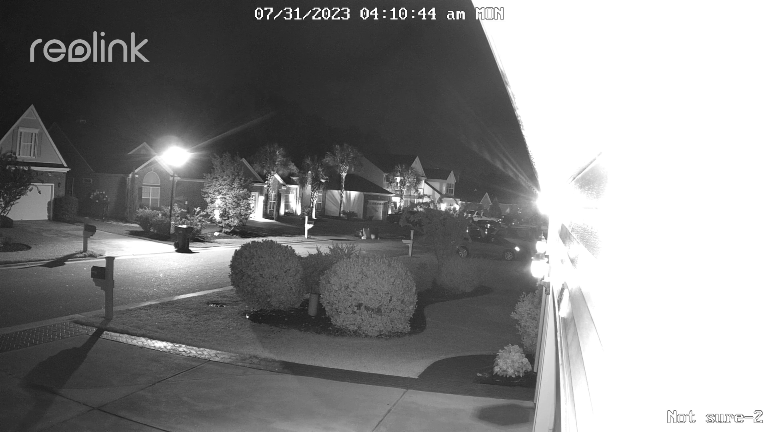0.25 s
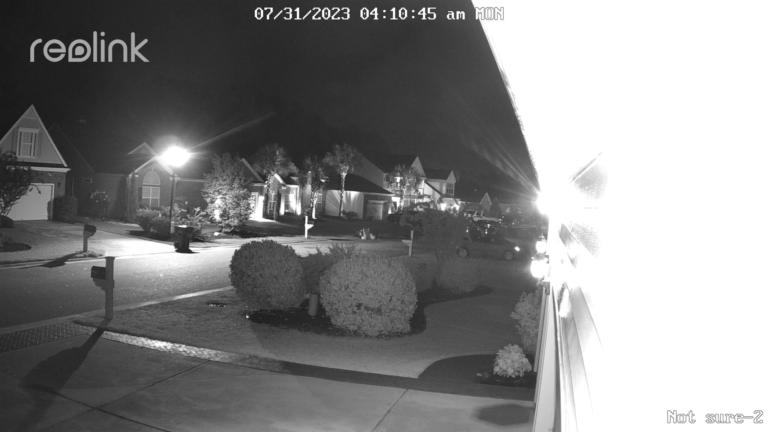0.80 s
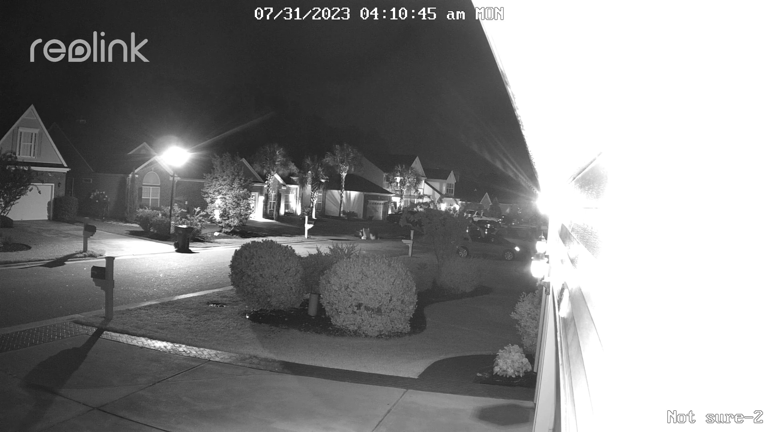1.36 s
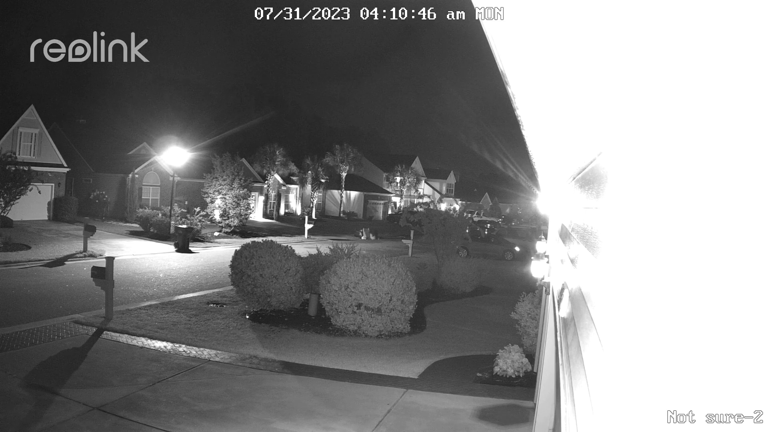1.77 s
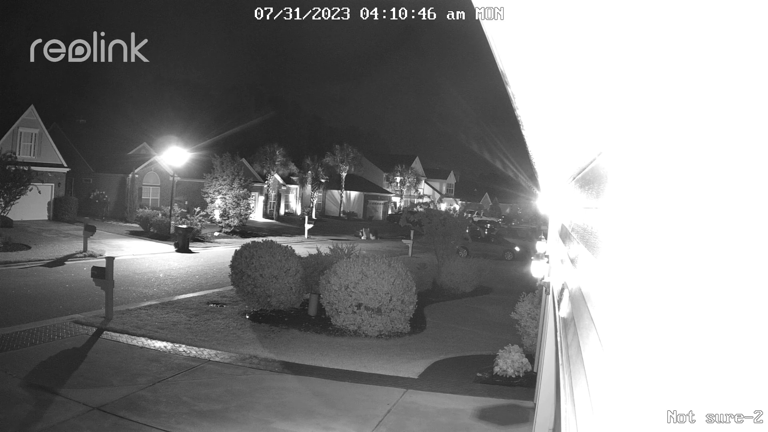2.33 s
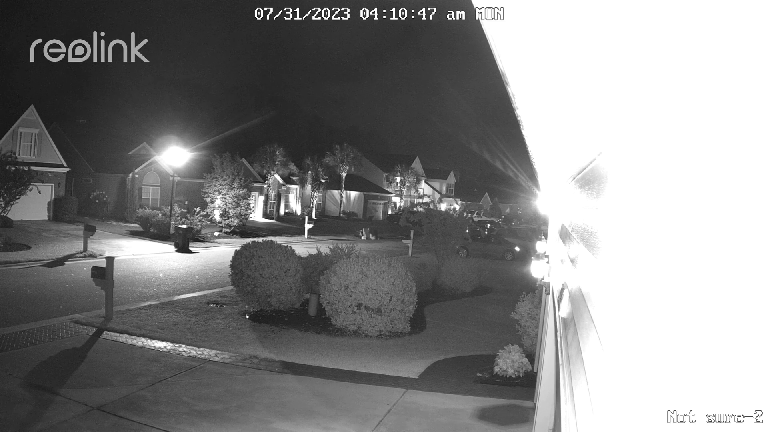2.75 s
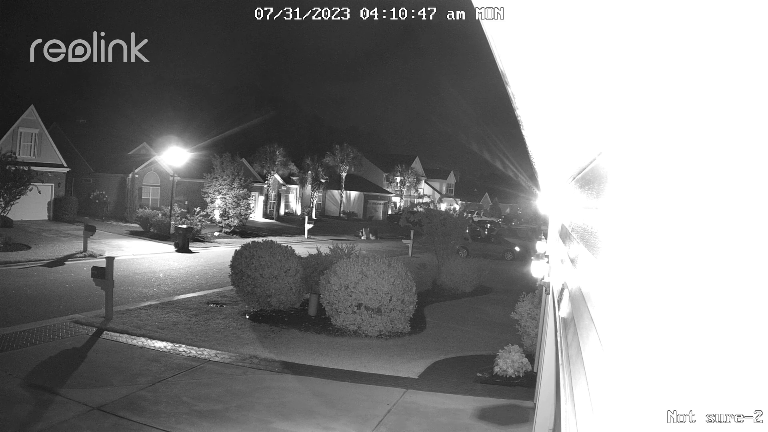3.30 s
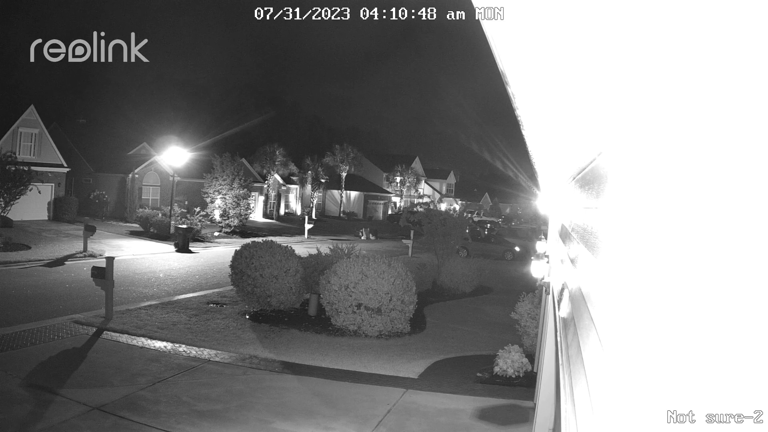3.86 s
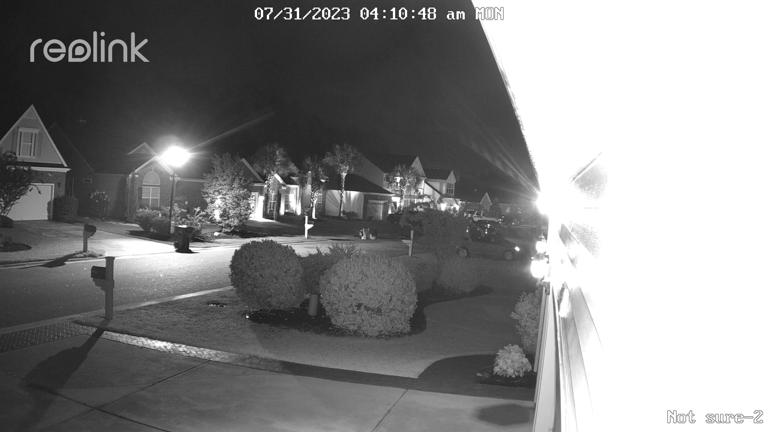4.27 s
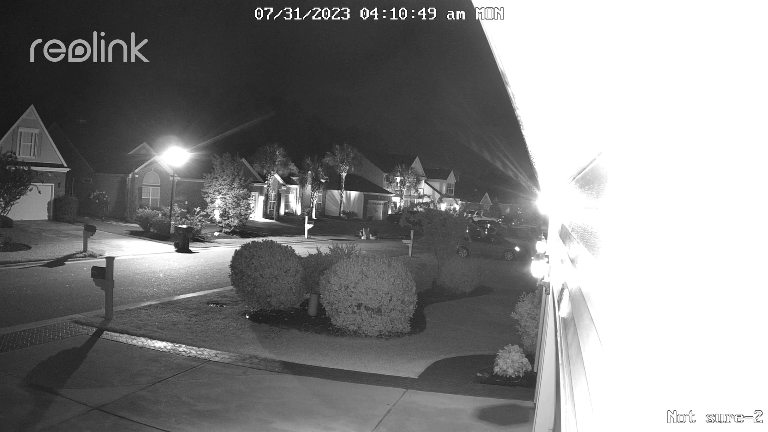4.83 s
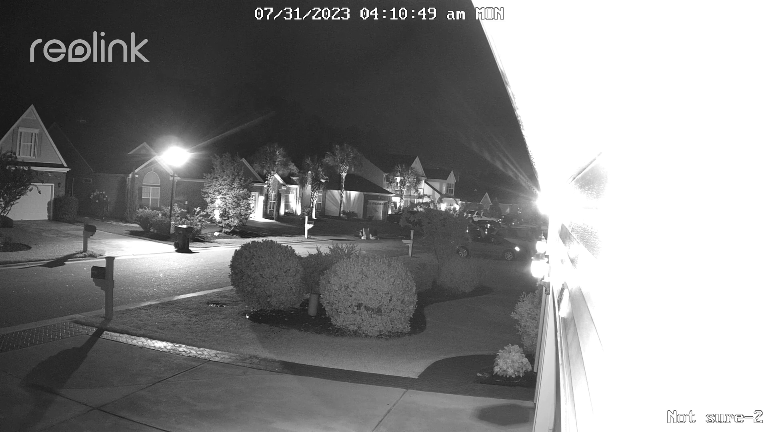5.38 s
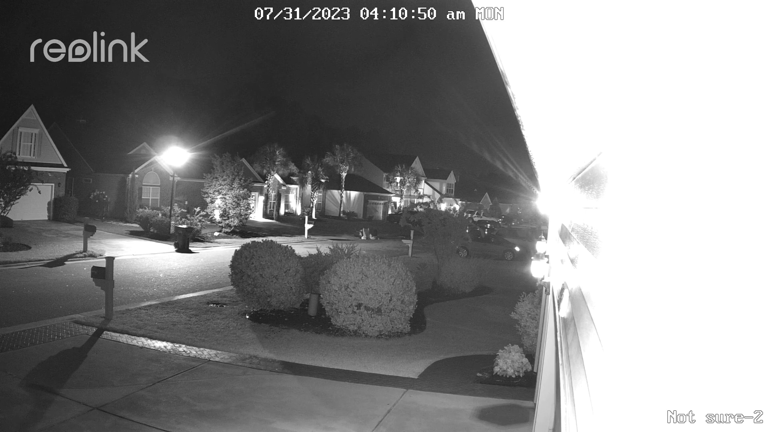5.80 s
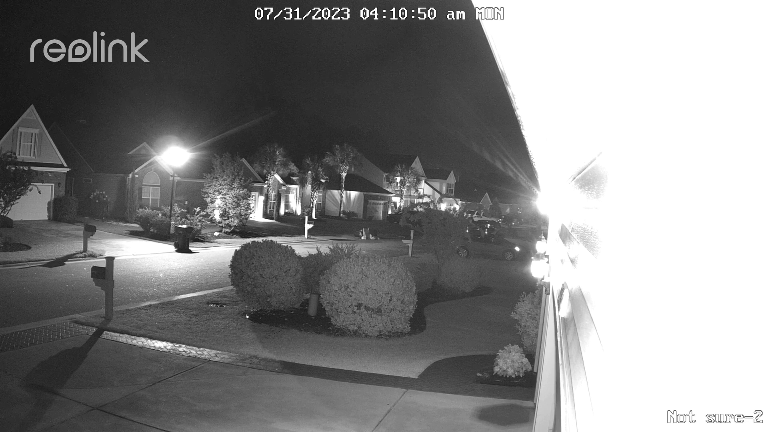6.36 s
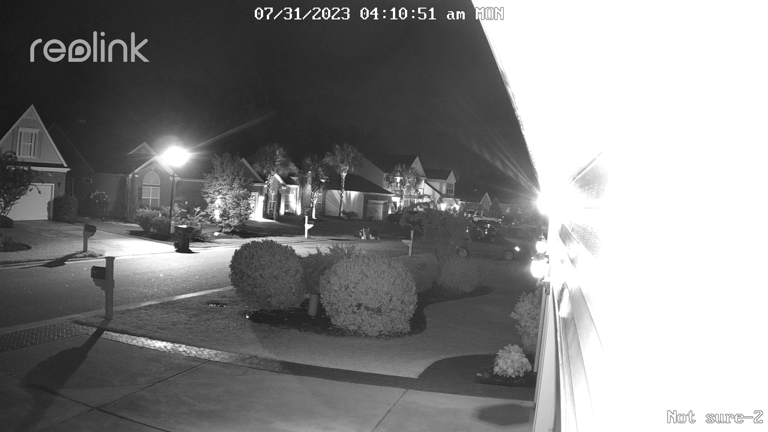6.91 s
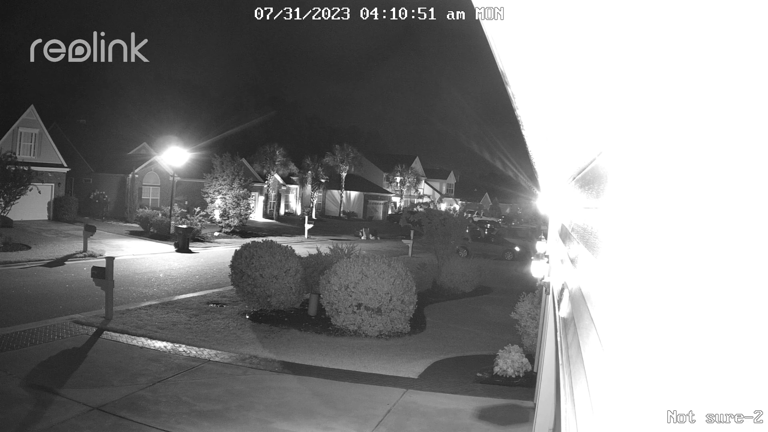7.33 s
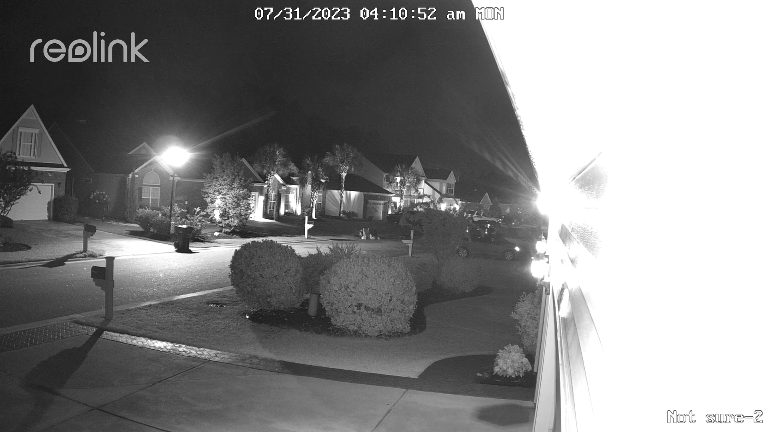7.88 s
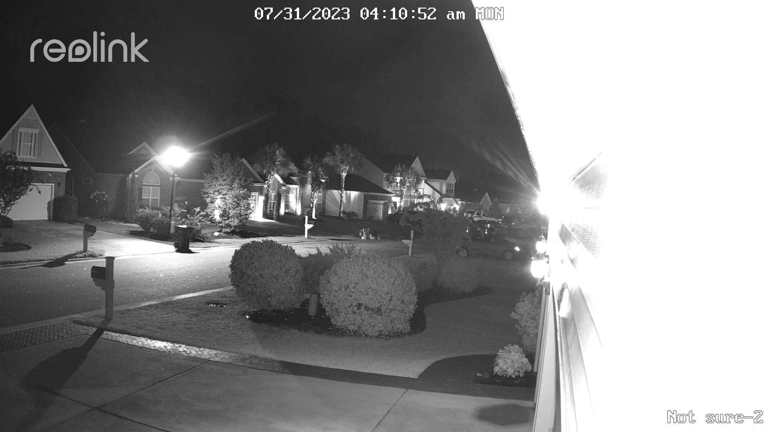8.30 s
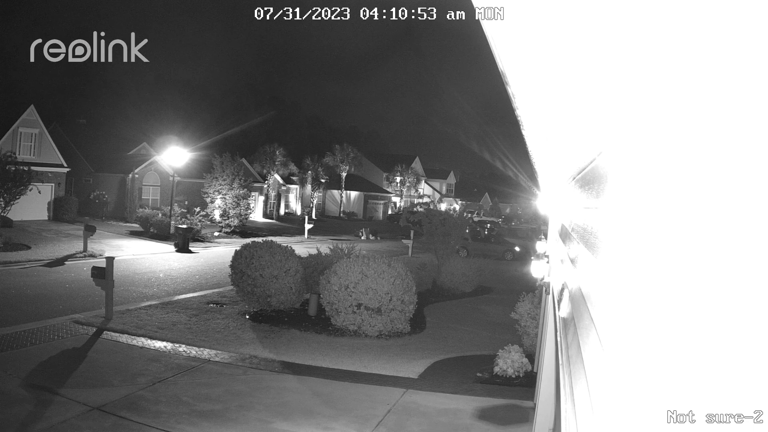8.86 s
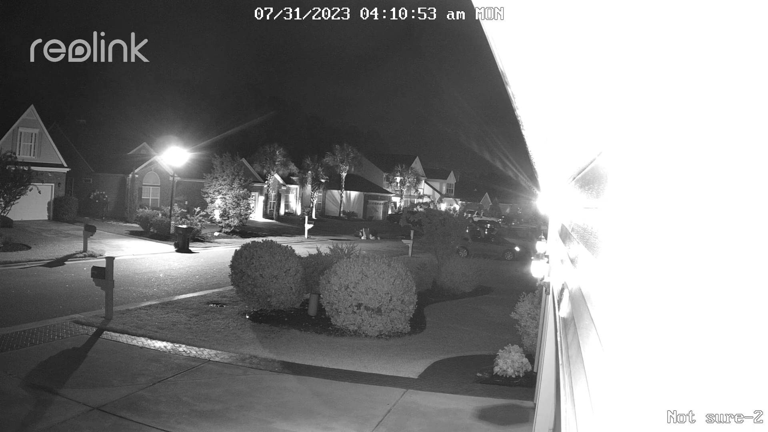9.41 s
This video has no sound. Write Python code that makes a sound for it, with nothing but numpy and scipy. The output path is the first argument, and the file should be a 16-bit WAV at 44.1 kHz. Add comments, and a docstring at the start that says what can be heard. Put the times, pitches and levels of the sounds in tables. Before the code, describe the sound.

On a quiet residential street at night, a close cricket sings almost nonstop in fast, high, falling pulses with brief pauses. A fainter cricket and a distant insect shimmer lie behind it, over very low rumble. Something small taps, clicks and rubs on the casing around the small outdoor microphone, in scattered bursts, busiest around four and a half seconds and again just after six.

```python
"""A near cricket chirps throughout, with short pauses, in quick groups of falling pulses, on a quiet
street on a summer night. Behind it, a far cricket sings across the lawn, over a distant insect chorus
and faint town rumble. Something small, perhaps a bug, taps and scuffs on the housing of the outdoor
security camera whose small microphone hears it all. Crickets are swept tones with echoes, the chorus
is bands of noise, and knocks and skids ring resonances of the housing."""
import sys
import numpy as np
from scipy import signal
from scipy.fft import rfft, irfft, next_fast_len
from scipy.io import wavfile
from scipy.ndimage import uniform_filter1d

SR = 44100
rng = np.random.default_rng(int(sys.argv[2]) if len(sys.argv) > 2 else 0)


def to_wav(s):
    """Save 16-bit WAV."""
    ch = np.atleast_2d(s).T  # columns
    pcm = np.round(np.clip(ch, -1, 1) * 32767)  # PCM
    wavfile.write(sys.argv[1], SR, pcm.astype(np.int16))


N = 423801
TIME = np.arange(N) / SR   # seconds

# Night air and town rumble. Each row: frequency in Hz, relative spectral level in dB.
AIR_COLOUR = [(20, -1), (42, 4), (55, 5), (110, -6), (200, -9), (330, -18), (550, -22), (900, -22),
              (1600, -27), (3800, -28), (5500, -19.5), (6800, -30), (7600, -38), (8800, -50.5)]
AIR_DB = -55.5   # rms
# Distant air conditioners. Each row: frequency in Hz, usual rms level in dB.
HUM = [(41.2, -65.5), (120, -65.5)]
# Thin faint tones that come and go. Each row: start in seconds, end in seconds, frequency in Hz, peak in dB.
WHISTLES = [(.24, 2.1, 2950, -74), (.24, 2.1, 2535, -79), (1.4, 3.4, 2892, -73), (3.05, 4.3, 2724, -80),
            (6.3, 8.5, 2805, -75)]
# Bands of far insects. Each row: centre in Hz, nominal width in Hz, usual level in dB, throbs per second.
CHORUS = [(2074, 180, -75.5, 8.2), (4400, 1200, -75.5, 54), (4700, 330, -66, 5.8), (5300, 170, -68, 41),
          (6113, 220, -63.5, 55)]
# A distant insect swells into a short trill.
# Each row: middle in seconds, half length in seconds, centre in Hz, level at the middle in dB.
TRILLS = [(.95, 0.15, 5350, -62), (4.05, 0.3, 5300, -60.5), (6.8, 0.2, 5340, -60),
          (8.697, 0.17, 5300, -58.5)]

# Resonances of the camera housing, hollow, stiff and sharp.
# Each row: frequency in Hz, width of one filter section in Hz, usual strength in dB.
HOLLOW_MODES = [(240, 260, -13), (430, 260, -8), (640, 300, -2), (860, 280, 0)]
STIFF_MODES = [(1220, 850, 0), (1730, 2130, -3.5), (2040, 200, 1.5)]
SHARP_MODES = [(2523, 230, -5.5), (3172, 610, -0.5), (3940, 800, -3.5), (4560, 435, 5.5), (5300, 1100, -16),
               (6550, 1140, -17.5)]
# Dull bumps that shake the mount. Each row: start in seconds, rms over 25 ms in dB.
BUMPS = [(1.161, -46), (1.351, -49), (4.618, -42), (6.213, -33), (6.235, -38), (6.273, -39.5)]
# Soft rubs on the housing. Each row: peak time in seconds, peak level in dB, swell in dB per second.
RUBS = [(.6, -63.5, 24), (.93, -47, 81), (1.19, -54, 98), (1.371, -43.5, 256.5), (2.581, -47.5, 245),
        (2.85, -52.5, 63), (3.05, -50.5, 130), (4.15, -59.5, 45), (4.4, -41.5, 165), (4.728, -43, 34),
        (5.74, -54.5, 161), (6.269, -41.5, 202), (7.5, -66, 33.5), (7.72, -63, 99), (7.96, -63.5, 104)]
RUB_FADE_DB_PER_S = 80   # all rubs die away alike
# Colour of the rubbing noise. Each row: frequency in Hz, relative spectral level in dB.
RUB_COLOUR = [(80, 0.5), (260, 6.5), (450, -1), (850, -2.5), (1300, -3), (2000, -5), (3200, 1), (4300, 4),
              (5500, -4), (7500, -22), (9000, -35)]
# Scuffs on the housing. Each row: start in seconds, length in seconds, hollow and sharp levels in dB.
SCUFFS = [(0.915, 0.023, -42, -54), (0.944, 0.028, -56, -70), (1.155, 0.015, -47, -46.5),
          (3.056, 0.028, -55.5, -54), (4.221, 0.033, -61, -54), (4.336, 0.037, -55, -40),
          (4.463, 0.086, -56, -41), (5.82, .07, -64, -60), (6.105, 0.096, -62, -47),
          (6.19, 0.019, -43.5, -32), (6.225, 0.065, -52, -40), (6.263, 0.024, -47.5, -34.5),
          (6.295, 0.016, -56, -36.5), (7.45, 0.12, -82, -58), (7.927, 0.033, -62, -55)]
# Single taps on the housing. Each row: start in seconds, hollow, stiff and sharp rms over 10 ms in dB.
TAPS = [(0.7255, -55.5, -80, -58), (0.851, -55, -70, -39.5), (1.144, -63, -61, -40),
        (1.348, -35.5, -41.5, -24.5), (2.3823, -51.5, -70, -60), (2.5417, -44, -62, -35),
        (2.6045, -54, -73, -50), (2.7953, -56, -59, -39), (2.818, -56, -54, -42),
        (2.987, -52.5, -70, -43.5), (3.007, -47.5, -64, -37), (3.031, -40, -63, -39),
        (4.3486, -51, -60, -40), (4.359, -40.5, -53, -35), (4.3694, -47, -48, -30),
        (4.386, -43, -42.5, -23.5), (4.461, -50, -59, -28), (4.4823, -41, -44, -25),
        (4.5287, -65, -44, -34.5), (4.617, -44.5, -54, -36.5), (4.6256, -39, -42, -23),
        (4.666, -56, -46, -42), (4.7085, -45.5, -38, -25.5), (5.6023, -73, -75, -52),
        (5.7076, -37.5, -42.5, -38), (6.2149, -37.5, -48, -28.5), (6.22, -36.5, -47, -30.5),
        (6.7906, -71, -73, -52), (7.3764, -76, -71, -48.5), (7.566, -79, -82, -54),
        (7.724, -48.5, -74, -48), (7.919, -46, -74, -53), (7.944, -47.5, -71, -35.5),
        (8.0604, -74, -72, -50)]

# The near cricket sings triplets until an odd chirp opens a new phrase.
# Each row: start in seconds, strokes in the opening chirp (0 = it falls silent until the next row).
PHRASES = [(0.009, 3), (0.528, 5), (0.623, 5), (1.003, 6), (1.775, 1), (1.861, 5), (2.019, 0), (2.46, 5),
           (2.607, 4), (2.677, 5), (2.768, 2), (2.806, 5), (2.894, 5), (2.983, 4), (3.34, 4), (3.811, 4),
           (3.886, 2), (4.041, 5), (4.129, 2), (4.227, 5), (4.32, 4), (4.395, 4), (4.465, 4), (4.724, 4),
           (4.858, 4), (5.045, 6), (5.157, 5), (5.84, 0), (6.131, 4), (6.209, 2), (6.25, 5), (6.777, 6),
           (6.995, 3), (7.051, 5), (7.193, 0), (7.33, 4), (7.455, 5), (8.05, 6), (8.57, 4), (8.642, 5),
           (8.797, 2), (8.965, 0), (9.348, 4), (9.64, 0)]
WINGBEAT_S = .0146   # usual time from stroke to stroke
STROKE_DB, SLOW_BEAT_DB_PER_MS = -34, 0.93   # usual peak of a first stroke; slower beats are louder

# Moments when the treble drops out. Each row: start in seconds, end in seconds.
DROPOUTS = [(1.325, 1.384), (2.413, 2.599), (4.332, 4.389), (4.588, 4.646), (6.06, 6.119), (7.278, 7.335),
            (9.325, 9.384)]
CUTOFF_HZ = 8900   # top of the band


def from_db(db):
    """Decibels to gain."""
    return 10 ** (np.asarray(db) / 20)


def rms_one(x):
    """Scale to rms 1."""
    return x / np.sqrt(np.mean(x ** 2) + 1e-20)


def add(track, start, sound):
    """Mix a sound into the track from a start in seconds, trimmed to the track."""
    at = int(round(start * SR))
    lo, hi = max(at, 0), min(at + len(sound), N)
    if hi > lo:
        track[lo:hi] += sound[lo - at:hi - at]


def drift(rate, size=N):
    """A random wander of rms 1: straight lines between random knots, rate knots per second."""
    position = np.arange(size) / SR * rate
    knots = rng.standard_normal(12000)
    return rms_one(np.interp(position, np.arange(len(knots)), knots))


def noise(gain_at):
    """Noise of rms 1 whose spectrum follows a function of frequency."""
    size = next_fast_len(N)
    hz = np.maximum(np.fft.rfftfreq(size, 1 / SR), 1)
    spectrum = rfft(rng.standard_normal(size)) * gain_at(hz)
    return rms_one(irfft(spectrum, size)[:N])


def coloured(points):
    """Noise with a spectrum given as (Hz, dB) points, joined along log frequency."""
    at, db = np.transpose(points)
    return noise(lambda hz: from_db(np.interp(np.log(hz), np.log(at), db)))


def resonate(force, modes, scatter_db=3.0):
    """Parallel resonances with steep skirts; each contact point favours them differently."""
    out = 0
    for k, (hz, width, db) in enumerate(modes):
        r = np.exp(-np.pi * width / SR)
        section = [(1 - r * r) / 2, 0, (r * r - 1) / 2, 1, -2 * r * np.cos(2 * np.pi * hz / SR), r * r]
        strength = from_db(db + scatter_db * rng.standard_normal())
        sense = (-1) ** k   # neighbours move in opposite senses
        out = out + sense * strength * signal.sosfilt([section, section], force)
    return out


def echoes(x, t60, count=60):
    """Scattered reflections from walls, paving and shrubs; a response of unit energy."""
    delay = rng.uniform(.002, .16, count)   # seconds
    response = np.zeros(SR // 5)
    response[(delay * SR).astype(int)] = rng.standard_normal(count) * from_db(-60 * delay / t60)
    return signal.fftconvolve(x, response / np.linalg.norm(response))[:N]


def stroke(hz, rise, fall_per_s=49000, bend=4140000.0, fade=0.0071):
    """One wing stroke, centred in 20 ms: the scraper slows along the file, so the tone falls ever faster."""
    t = np.arange(-SR // 100, SR // 100) / SR
    reach = np.minimum(np.where(t < 0, -t / rise, t / fade), 1)
    swell = np.cos(np.pi / 2 * reach) ** np.where(t < 0, 1, 1.5)
    pitch = hz - fall_per_s * t - bend * t * t   # fall in Hz per s, bend in Hz per s squared
    return swell * np.sin(2 * np.pi * (np.cumsum(pitch) / SR + rng.random()))


def town():
    """Rumble and hiss as coloured noise, with far machines as tones wavering in level and phase."""
    hum = np.zeros(N)
    for hz, db in HUM:
        level = from_db(db + 2 * drift(2.8)) * np.sqrt(2)   # rms to peak
        hum += level * np.sin(2 * np.pi * hz * TIME + 0.64 * drift(3))
    return from_db(AIR_DB) * coloured(AIR_COLOUR) + hum


def whistles():
    """Thin, nearly steady tones come in quickly and fade out over half a second."""
    out = np.zeros(N)
    for start, end, hz, db in WHISTLES:
        gate = np.clip(np.minimum((TIME - start) / .04, (end - TIME) / .5), 0, 1)
        pitch = hz + 3 * drift(14)
        out += gate * from_db(db) * np.sin(2 * np.pi * np.cumsum(pitch) / SR)
    return out


def chorus(throb=0.17):
    """Many distant singers of each kind blur into a narrow, throbbing band of noise."""
    out = np.zeros(N)
    for centre, width, db, rate in CHORUS:
        band = noise(lambda hz: 1 / (1 + ((hz - centre) / (1.1 * width)) ** 2) ** 1.22)
        uneven_rate = rate * (1 + .15 * drift(8))
        beat = np.sin(2 * np.pi * np.cumsum(uneven_rate) / SR)
        waver_db = .7 * drift(9)
        out += band * (1 + throb * beat) * from_db(db + waver_db)
    return out


def trills(width_hz=110):
    """One far singer, a narrow band of noise, rises out of the chorus now and then."""
    out = np.zeros(N)
    for middle, half, centre, db in TRILLS:
        band = noise(lambda hz: np.exp(-((hz - centre) / width_hz) ** 2))
        out += band * from_db(db) * np.exp(-((TIME - middle) / half) ** 2)
    return out


def far_cricket(hz=4810, db=-52, period=0.058, gap=.019, echo_db=-8):
    """A second cricket of the same kind sings steady triplets across the lawn, with strong echoes."""
    out = np.zeros(N)
    for chirp in range(170):
        start = chirp * period + rng.normal(0, .003)
        for k in range(3):
            gain = from_db(db + rng.normal(0, 1.0))
            pulse = stroke(hz + rng.normal(0, 30), rise=0.0051)
            add(out, start + k * gap, gain * pulse)
    return out + from_db(echo_db) * echoes(out, t60=0.24)


def blip(start=8.878, hz=2630, db=-44, peak_s=.0016):
    """One small rounded pip: a tone that swells at once and dies away."""
    out, t = np.zeros(N), np.arange(SR // 25) / SR
    swell = t / peak_s * np.exp(1 - t / peak_s)
    add(out, start, from_db(db) * swell * np.sin(2 * np.pi * hz * t))
    return out


def bumps(low_hz=75, high_hz=230, fade_s=0.021):
    """The mount shudders for a moment under a heavier push: a dying burst of low noise."""
    out, t = np.zeros(N), np.arange(SR // 10) / SR
    band = signal.butter(2, [low_hz, high_hz], "band", fs=SR, output="sos")
    for start, db in BUMPS:
        push = rng.standard_normal(len(t)) * np.exp(-t / fade_s)
        shudder = rms_one(signal.sosfilt(band, push)) / 2   # rms 1 over 25 ms
        add(out, start, from_db(db) * shudder)
    return out


def rubbing(grain_db=3.0, clump_db=2.0):
    """A soft crackly rustle, noise of uneven grain, swells to each peak and dies away after it."""
    levels = [db - np.maximum(swell * (peak - TIME), RUB_FADE_DB_PER_S * (TIME - peak))
              for peak, db, swell in RUBS]
    level_db = np.max(levels, axis=0)   # the loudest rub wins
    grains = rms_one(from_db(grain_db * drift(400) + clump_db * drift(70)))
    return coloured(RUB_COLOUR) * grains * from_db(level_db)


def scuffs(grain_db=-1.5, stiff_db=-4, rise_s=0.00073, fade_s=0.0046):
    """Dense uneven slips, as noise under a brief pressure, shake the same modes as the taps."""
    out, t = np.zeros(N), np.arange(SR // 8) / SR
    for start, length, hollow_db, sharp_db in SCUFFS:
        pressure = np.clip(t / rise_s, 0, 1) * np.exp(-np.maximum(t - length, 0) / fade_s)
        grains = from_db(grain_db * drift(586.6, size=len(t)))
        force = pressure * rng.standard_normal(len(t)) * grains
        parts = ((HOLLOW_MODES, hollow_db), (SHARP_MODES, sharp_db), (STIFF_MODES, hollow_db + stiff_db))
        for modes, db in parts:
            ring = np.sqrt(length / t[-1]) * rms_one(resonate(force, modes))   # longer scuffs carry more
            add(out, start, from_db(db) * ring)
    return out


def taps(contact_s=0.0031, grit=0.22, echo_db=-15):
    """A contact with a short gritty skid, a click and dying noise, rings the housing."""
    out, t = np.zeros(N), np.arange(SR // 25) / SR
    for start, *levels in TAPS:
        force = (t == 0) + grit * rng.standard_normal(len(t)) * np.exp(-t / contact_s)
        for modes, db in zip((HOLLOW_MODES, STIFF_MODES, SHARP_MODES), levels):
            ring = rms_one(resonate(force, modes)) / 2   # rms 1 over 10 ms
            add(out, start, from_db(db) * ring)
    return out + from_db(echo_db) * echoes(out, t60=0.14)


def chirps():
    """The wings beat steadily and skip one beat after each chirp; gives (start s, strokes, beat s)."""
    for (start, strokes), (end, _) in zip(PHRASES, PHRASES[1:]):
        opening = round(strokes)
        if opening:
            beats_left = (end - start) / WINGBEAT_S - opening - 1
            triplets = max(round(beats_left / 4), 0)
            phrase = [opening] + [3] * triplets
            beat = (end - start) / (sum(phrase) + len(phrase))   # fills the phrase exactly
            for count in phrase:
                yield start, count, beat
                start += (count + 1) * beat


def near_cricket(first_hz=4710, later_hz=4600, scatter_hz=34, sag_db=0.96, chirp_db=0.47, stroke_db=0.8,
                 sweep_scatter=.15, hurry_s=.0004, first_rise=0.0056, later_rise=0.0041,
                 wall_s=.012, wall_db=-20, echo_db=-20):
    """Chirps ease into a usually highest, loudest stroke; later ones hurry, start sharply and sweep unevenly."""
    out = np.zeros(N)
    for start, strokes, beat in chirps():
        db = STROKE_DB + SLOW_BEAT_DB_PER_MS * (beat - WINGBEAT_S) * 1000
        db += chirp_db * rng.standard_normal()
        for k in range(strokes):
            hz = later_hz + (first_hz - later_hz) * 0.25 ** k + scatter_hz * rng.standard_normal()
            gain = from_db(db - sag_db * min(k, 2) + stroke_db * rng.standard_normal())
            fall = 47000 * (1 + sweep_scatter * rng.standard_normal())   # Hz per s
            pulse = stroke(hz, later_rise if k else first_rise, fall_per_s=fall)
            middle = start + k * beat + (-hurry_s if k else hurry_s)
            add(out, middle - len(pulse) / SR / 2, gain * pulse)
    wall = np.pad(out, (int(wall_s * SR), 0))[:N]   # the house front sends each stroke back
    return out + from_db(wall_db) * wall + from_db(echo_db) * echoes(out, t60=0.19)


def scene():
    """Everything reaches one microphone."""
    background = town() + whistles()
    insects = chorus() + trills() + far_cricket() + near_cricket()
    housing = bumps() + rubbing() + scuffs() + taps()
    return (background + insects + housing + blip())[None]


def record(dry, dull_stop_hz=4520 * 1.092, microphone_hz=7900):
    """Peaks are rounded, the treble drops out for moments, and the band ends near 9 kHz."""
    rounded = .3 * np.tanh(dry / .3)
    sound = signal.sosfilt(signal.butter(8, microphone_hz, fs=SR, output="sos"), rounded)
    dull = signal.sosfiltfilt(signal.cheby2(12, 40, dull_stop_hz, fs=SR, output="sos"), sound)
    dropped = sum((TIME > start) & (TIME < end) for start, end in DROPOUTS)
    share = uniform_filter1d(dropped.astype(float), size=250)   # short crossfades
    top = signal.firwin(301, CUTOFF_HZ, fs=SR)
    return signal.fftconvolve(sound + share * (dull - sound), top[None], mode="same")


dry = scene()
out = record(dry)
to_wav(out)
```